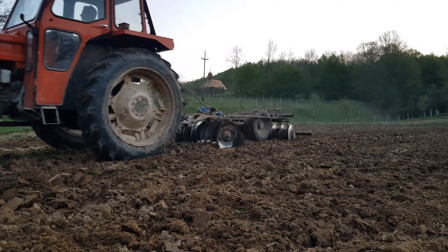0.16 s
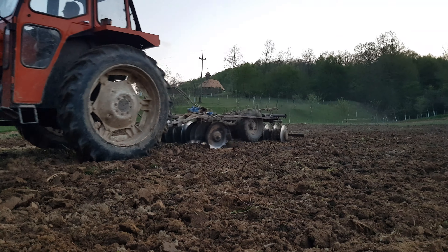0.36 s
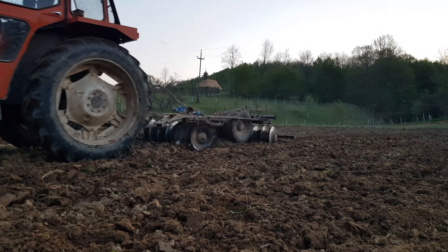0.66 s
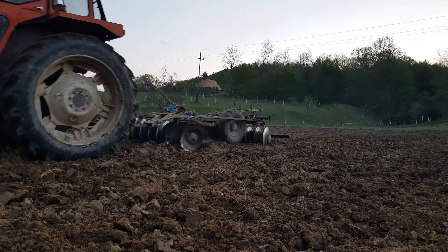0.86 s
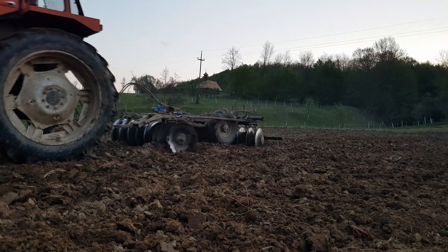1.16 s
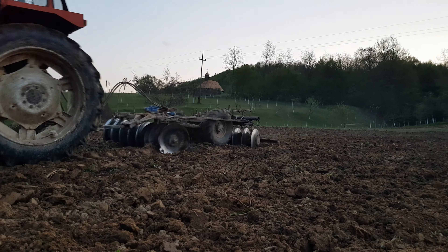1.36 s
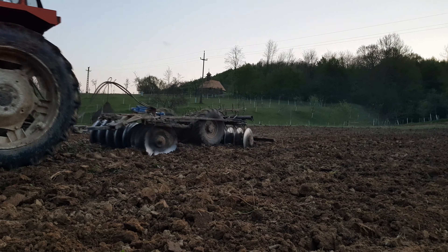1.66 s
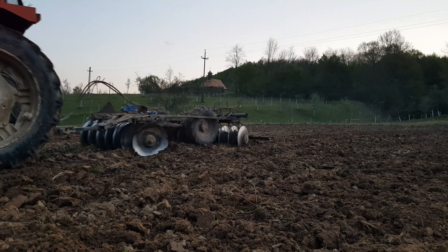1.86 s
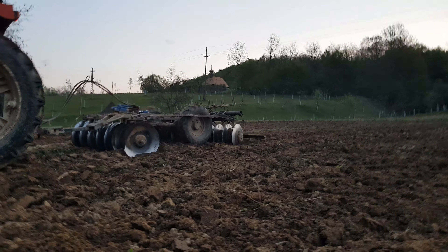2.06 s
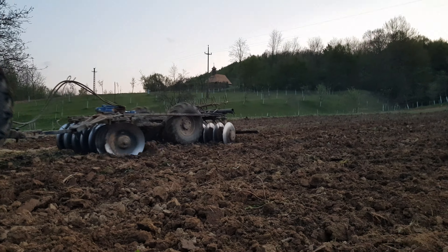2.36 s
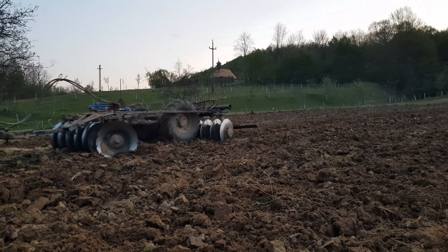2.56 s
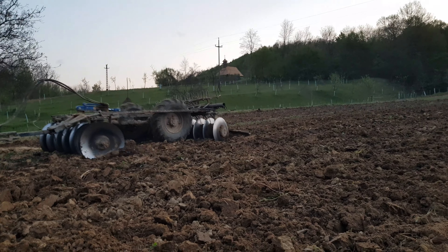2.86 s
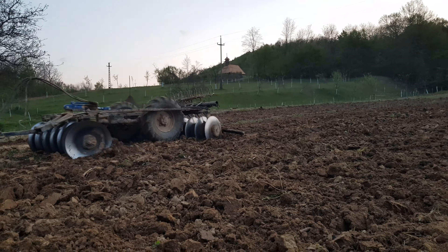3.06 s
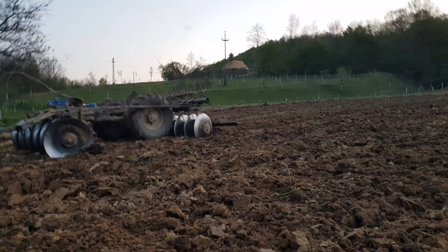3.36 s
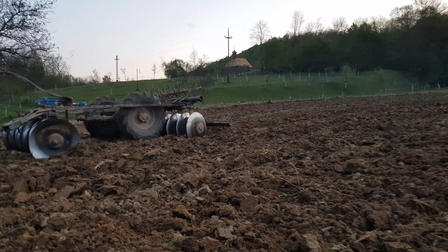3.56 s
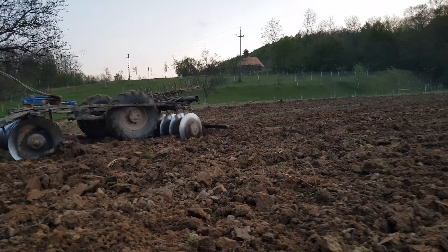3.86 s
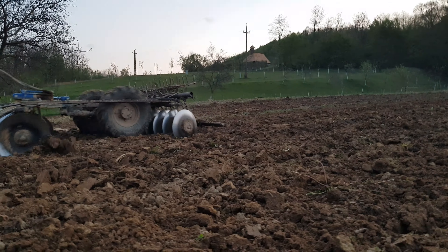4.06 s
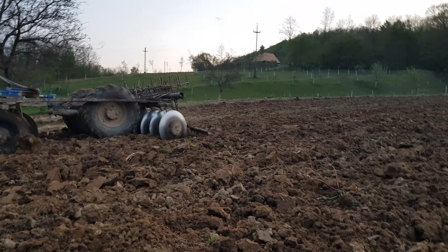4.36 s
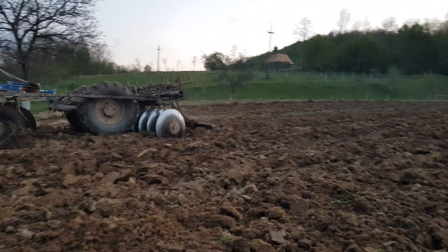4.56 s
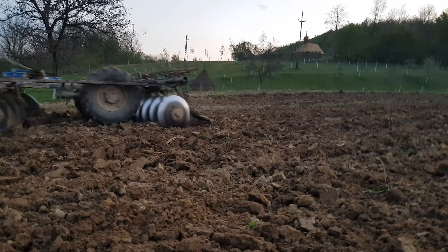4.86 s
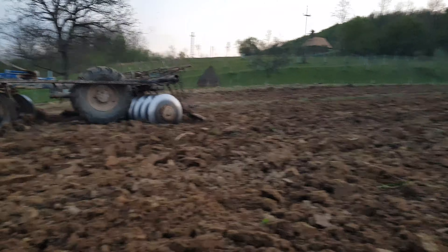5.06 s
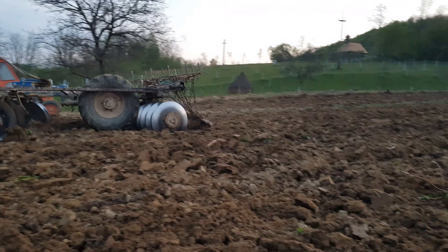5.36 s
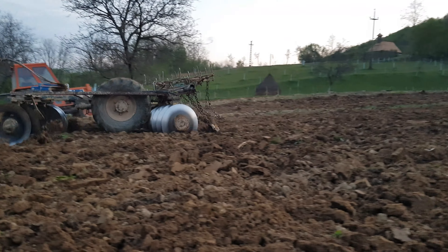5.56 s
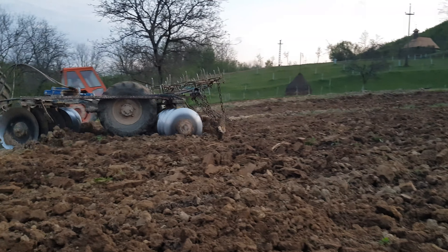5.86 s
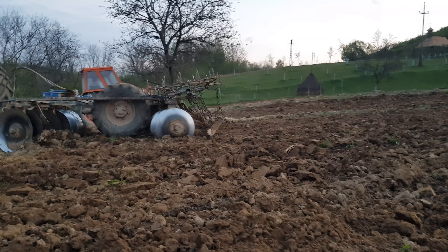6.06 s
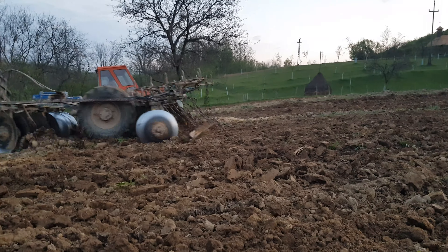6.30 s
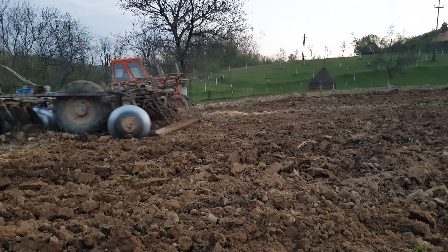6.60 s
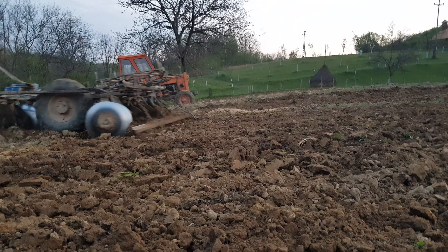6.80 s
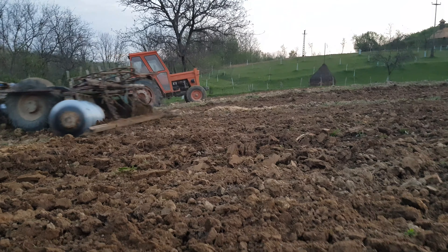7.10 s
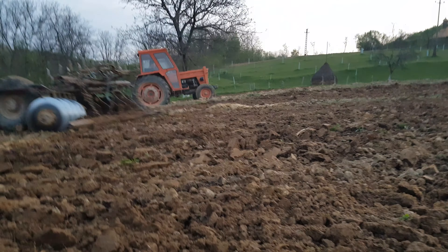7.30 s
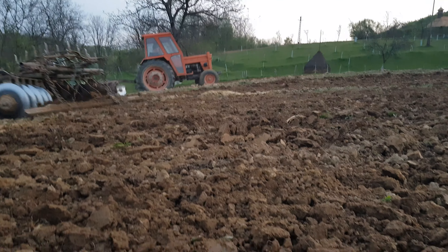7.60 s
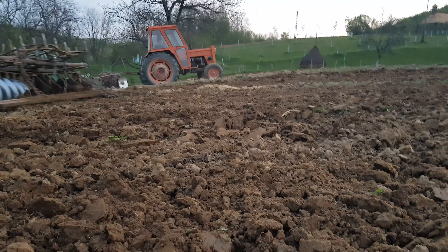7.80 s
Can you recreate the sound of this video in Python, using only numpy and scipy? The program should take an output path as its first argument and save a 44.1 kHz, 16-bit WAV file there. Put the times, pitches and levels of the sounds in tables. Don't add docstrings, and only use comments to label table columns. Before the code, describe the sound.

Close rough diesel clatter fades over a tilled field while a dry bearing squeals, discs click against stones, and another tractor's buzzing engine takes over.

```python
import sys
import numpy as np
from scipy import signal
from scipy.fft import rfft, irfft
from scipy.io import wavfile
from scipy.ndimage import map_coordinates

SR = 44100
rng = np.random.default_rng(int(sys.argv[2]) if len(sys.argv) > 2 else 0)


def transcribe(u):
    v = np.clip(np.atleast_2d(u).T, -1, 1)
    q = np.round(v * 32767).astype(np.int16)
    wavfile.write(sys.argv[1], SR, q)


def linear_from_db(decibels):
    return 10 ** (np.asarray(decibels, float) / 20)


N = 350154
TIME = np.arange(N) / SR
HZ = np.fft.rfftfreq(N, 1 / SR)

# t/s, distance loss as level/dB, lead of the left port/samples
NEAR_PATH = [
    (0, 0.5, 14.4),
    (1, 0.5, 17.5),
    (1.6, 2, 17.8),
    (2.5, -3, 19),
    (3.5, -3.5, 19),
    (4.5, -6, 19.6),
    (5.5, -6, 19.2),
    (6.3, -10.5, 11.2),
    (8, -14, 7),
]


def rms_one(x):
    return x / np.sqrt(np.mean(x ** 2) + 1e-20)


def in_time(rows):
    s, *columns = np.transpose(rows)
    return [np.interp(TIME, s, c) for c in columns]


def after(at_s, over_s):
    return 1 / (1 + np.exp((at_s - TIME) / over_s))


def around(at_s, over_s):
    return np.exp(-((TIME - at_s) / over_s) ** 2)


def at_hz(points):
    hz, value = np.transpose(points)
    return np.interp(np.log(HZ + 1), np.log(hz), value)


def filtered(x, response):
    return irfft(rfft(x) * linear_from_db(at_hz(response)), N)


def coloured(x, spectrum):
    return rms_one(filtered(x, spectrum))


def drift(rate):
    r = np.exp(-80 * np.pi * rate / SR)
    slow = signal.lfilter([1], [1, -2 * r, r * r], rng.standard_normal(N // 40 + 2002))[2000:]
    return np.interp(np.arange(N) / 40, np.arange(len(slow)), rms_one(slow))


def late(x, samples):
    return map_coordinates(x, [np.arange(N) - samples], order=3, mode="nearest")


def train(at, db):
    clicks = np.zeros(N)
    clicks[at] = linear_from_db(db)
    return clicks


def dying(clicks, rise_s, fall_s):
    rise, fall = np.exp(-2 / (rise_s * SR)), np.exp(-1 / (fall_s * SR))
    tails = signal.lfilter([1], [1, -fall], clicks)
    return signal.lfilter([(1 - rise) ** 2], [1, -2 * rise, rise ** 2], tails)


def ring(clicks, hz, t60):
    r, w = linear_from_db(-60 / (t60 * SR)), 2 * np.pi * hz / SR
    return signal.lfilter([0, np.sin(w)], [1, -2 * r * np.cos(w), r * r], clicks + 1e-18)


def firings(turns, offset, jitter_s):
    at = np.flatnonzero(np.diff(np.floor(turns - offset))) + 1
    moved = at + (jitter_s * SR * rng.standard_normal(len(at))).astype(int)
    return np.clip(moved, 0, N - 1), np.floor(turns[at] - offset).astype(int)


def exhaust(turns, orders, level_db, pipe_lag, pipe_phase, wobble_db):
    tones = 0
    for k, db in orders:
        phase = k * (2 * np.pi * turns - pipe_lag) - pipe_phase
        tones = tones + linear_from_db(db + wobble_db * drift(3.3)) * np.cos(phase)
    return np.sqrt(2) * linear_from_db(level_db) * tones


def ports(pair, lead):
    # f/Hz, likeness (0-1)
    likeness = [(100, .995), (700, .98), (1500, .92), (3000, .75), (6000, .5), (16000, .5)]
    alike = np.clip(at_hz(likeness), 0, 1)
    first, second = rfft(pair)
    other = irfft(alike * first + np.sqrt(1 - alike ** 2) * second, N)
    return np.array([pair[0], late(other, lead)])


def cab_hides(at_s=6.12):
    return after(at_s, 0.45)


def near_level(close_db, share, hidden_db, hidden=None):
    hidden = cab_hides() if hidden is None else hidden
    return close_db + share * in_time(NEAR_PATH)[0] + hidden_db * hidden


def near_knock(at, force_db):
    # f/Hz, level/dB, t60/s
    block = [(1340, 7, 0.0086), (2032, -5.5, 0.029), (2180, -4.5, 0.032), (2383, 9, 0.012),
             (2696, 0, 0.026), (2980, -4, 0.016), (3730, 3.5, 0.015), (4103, -1.5, 0.031),
             (4700, -31, 0.016), (5610, 7, 0.0059), (6300, -27, 0.0067)]
    # f/Hz, level per Hz/dB
    knock_colour = [(300, -52), (800, 10), (1300, 10), (2500, 6.5), (3600, 11.5), (5000, 11.5),
                    (8000, 13.5), (16000, -3)]
    body = dying(train(at, force_db), rise_s=0.0007, fall_s=0.0058) * rng.standard_normal((2, N))
    white = rng.standard_normal((2, N))
    rings = 0
    for hz, db, t60 in block:
        mode_db = force_db + db + 2.0 * rng.standard_normal(len(at))
        burn = dying(train(at, mode_db), rise_s=0.0034, fall_s=0.0089)
        rings = rings + ring(burn * white, hz, t60)
    knock = coloured(rms_one(body) + linear_from_db(-4) * rms_one(rings), knock_colour)
    return linear_from_db(near_level(-33.5, 0.92, -22)) * knock


def near_leak(at, force_db):
    # f/Hz, level per Hz/dB
    jet_colour = [(2500, -20), (5000, -4), (8500, -2), (11000, 1), (16000, 2)]
    crack_db = force_db + 1.4 * rng.standard_normal(len(at))
    crack = dying(train(at, crack_db), rise_s=0.0033, fall_s=0.003) * rng.standard_normal((2, N))
    level_db = near_level(-31.5, 0.17, -32, hidden=cab_hides(at_s=5.5))
    return linear_from_db(level_db) * coloured(crack, jet_colour)


def near_rattle(turns):
    # f/Hz, level per Hz/dB
    rattle_colour = [(200, -74), (500, 0.5), (1000, 2), (2000, -2), (4000, -6.5), (8000, -3.5),
                     (16000, -8.5)]
    swell = linear_from_db(0.58 * drift(24) + 0.078 * np.cos(4 * np.pi * turns))
    rattle = coloured(rng.standard_normal((2, N)) * swell, rattle_colour)
    return linear_from_db(near_level(-37, 0.59, 0)) * rattle


def near_pops(at, pop_db, pitch, pop_ms):
    level_db = -45 + 5.5 * around(3.6, 0.99) - 23.5 * cab_hides()
    pop_at = np.clip(at + (pop_ms * SR / 1000).astype(int), 0, N - 1)
    pop_db = pop_db + 0.5 * rng.standard_normal(len(at))
    pops = rms_one(dying(train(pop_at, pop_db), rise_s=0.002, fall_s=0.008))
    pipe_hz = 495 + (580.3 - 495) * after(3.2, 0.4)
    pipe_hz = pipe_hz * np.interp(np.arange(N), pop_at + 200, pitch) * (1 + 0.03985 * drift(50.2))
    phase = 2 * np.pi * np.cumsum(pipe_hz) / SR
    return linear_from_db(level_db) * pops * (0.27 * np.cos(0.82 * phase) + 0.5 * np.cos(1.03 * phase))


def near_exhaust(turns):
    # multiple of the firing rate, level under the boom/dB
    upper_orders = [(1, -19), (1.5, -18), (2.5, -14), (3.25, -15), (4, -10), (4.25, -15), (5, -13),
                    (6, -14), (7, -20), (8.5, -25), (9.5, -24), (11.5, -24)]
    level_db = near_level(-26.5, 0.4, -1.8)
    away_db = -5 * after(2.0, 0.35) - 5 * cab_hides()
    third_db = -26 + away_db - level_db
    boom = exhaust(turns, [(2, 0), (3, third_db)], level_db, pipe_lag=0.45, pipe_phase=0.75, wobble_db=1.0)
    upper = exhaust(turns, upper_orders, -26 + 0.97 * away_db, pipe_lag=0.45, pipe_phase=0.75, wobble_db=2.2)
    throb = 1 + 0.38 * np.cos(2 * np.pi * (turns / 4 - 0.38))
    return boom + throb * upper


def near_tractor():
    # t/s, firing rate/Hz
    speed = [(0.0, 30.47), (2.46, 30.87), (2.77, 31.38), (2.92, 30.6), (4.52, 31.9), (4.64, 31.49),
             (5.8, 33.39), (8.0, 38.22)]
    # knock level/dB, brightness/dB, pop level/dB, pop pitch factor, pop lag/ms
    cylinders = [
        (3, 9, -7, 1.0, 9.6),
        (4, 10.5, -7, .95, 9),
        (1, 8, 1, 1.05, 14),
        (0, 10.5, 0, .95, 7.82),
    ]
    hunt_hz = 0.221 * np.sin(2 * np.pi * 1.201 * (TIME - 0.617))
    turns = np.cumsum(in_time(speed)[0] + hunt_hz) / SR - 0.2
    at, number = firings(turns, offset=0.78, jitter_s=0.0014)
    force_db, bright_db, pop_db, pitch, pop_ms = np.array(cylinders)[number % 4].T
    force_db = force_db + 1.25 * rng.standard_normal(len(at))
    engine = near_knock(at, force_db) + near_leak(at, force_db + bright_db) + near_rattle(turns)
    engine = engine + near_pops(at, pop_db, pitch, pop_ms)
    return ports(engine, in_time(NEAR_PATH)[1]), near_exhaust(turns)


def far_clatter(turns, level_db, lead, clear):
    # delay/ms, delay lost in the turn/ms, strength
    echoes = [
        (1.02, .27, .25),
        (1.84, .43, .45),
    ]
    # f/Hz, level per Hz/dB
    left_colour = [(250, 10), (500, -10), (780, 12), (1100, 7.5), (1640, 5.5), (2150, 17), (2780, 9.5),
                   (3050, 4), (4300, 12.5), (5500, 2.5), (7200, 7.5), (13000, 6.5)]
    right_colour = [(250, -29), (500, -16), (800, 16), (1100, 1.5), (1500, 14.5), (1640, -18), (1900, 6.5),
                    (2500, 3.5), (3300, 10.5), (4300, 11), (5700, 5), (11500, 7.5)]
    at, _ = firings(turns, offset=0.8, jitter_s=0.0005)
    force_db = 1.5 * rng.standard_normal(len(at))
    blows = rms_one(dying(train(at, force_db), rise_s=0.0025, fall_s=0.0012)) + 2.2
    clatter_db = -47 + 0.25 * (level_db - level_db.max()) + 6.5 * clear
    clatter = linear_from_db(clatter_db) * ports(rms_one(blows * rng.standard_normal((2, N))), lead)
    rasp_band = signal.butter(2, [3700, 4700], "band", fs=SR, output="sos")
    rasp_db = -5.5 - 42.5 + 37 * around(7.35, 0.47)
    clatter = clatter + linear_from_db(rasp_db) * signal.sosfilt(rasp_band, clatter * blows)
    soil = signal.butter(1, 5000, fs=SR, output="sos")
    dull = signal.sosfilt(soil, clatter)
    turned = after(7.15, 0.5)
    for ms, gained, strength in echoes:
        delay = (ms - gained * turned) * SR / 1000
        clatter = clatter + strength * np.array([late(side, delay) for side in dull])
    return np.array([filtered(clatter[0], left_colour), filtered(clatter[1], right_colour)])


def far_exhaust(turns, level_db, clear):
    # multiple of the firing rate, level under the boom/dB
    upper_orders = [(3, -17), (4, -23), (6, -26)]
    upper_db = -4 + 9 * around(7.2, 0.3)
    orders = [(1, 0), (2, -2.5 + 2 * clear)] + [(k, db + upper_db) for k, db in upper_orders]
    return exhaust(turns, orders, level_db, pipe_lag=0.75, pipe_phase=0.25, wobble_db=0.6)


def far_tractor():
    # t/s, firing rate/Hz
    speed = [(0.0, 45.57), (2.23, 46.1), (2.5, 50.44), (3.0, 48.25), (3.25, 52.04), (3.54, 52.03),
             (4.01, 54.45), (4.25, 51.8), (4.5, 57.19), (4.95, 55.57), (5.74, 56.07), (5.99, 54.49),
             (6.32, 55.13), (6.75, 53.49), (7.08, 57.35), (7.72, 57.74), (8.0, 57.0)]
    # t/s, exhaust level/dB, lead of the left port/samples
    path = [(0, -46, 14), (1, -41, 13), (1.85, -41, 12), (2.15, -33, 12), (2.9, -31, 12), (3.3, -28, 12),
            (4.15, -28, 12), (4.5, -24.5, 11), (6, -24, 7.3), (7, -23.5, 6), (8, -26, 4.5)]
    level_db, lead = in_time(path)
    clear = after(5.9, 0.23)
    turns = np.cumsum(in_time(speed)[0]) / SR
    return far_clatter(turns, level_db, lead, clear), far_exhaust(turns, level_db, clear)


def squeal():
    # t/s, peak level/dB, pitch f/Hz
    grip_events = [(4.8, -47, 4805), (5.03, -47, 4815), (5.19, -44, 4900), (5.25, -42, 4880),
                   (5.4, -38, 4885), (5.49, -39, 4865), (5.56, -38, 4840), (5.69, -30, 4900),
                   (5.77, -42, 4860), (5.96, -34, 4930), (6.03, -35, 4935), (6.145, -32, 4950),
                   (6.2, -38, 4960), (6.3, -43, 4935), (6.37, -36, 4915), (6.455, -41, 4885),
                   (6.52, -41, 4880), (6.58, -47, 4895), (6.7, -49, 4805)]
    s, db, hz = np.transpose(grip_events)
    rise_s, fall_s = 0.01, 0.05
    phase = 2 * np.pi * np.cumsum(np.interp(TIME, s, hz) + 16 * drift(70)) / SR
    octave_db = -18 + 16 * around(5.24, 0.1) + 3.0
    tone = np.cos(phase) + linear_from_db(octave_db) * np.cos(2 * phase)
    start = ((s - rise_s * 2.3) * SR).astype(int)
    grips = dying(train(start, db), rise_s, fall_s)
    rub = linear_from_db(-49) * after(4.86, 0.07) * (1 - after(6.61, 0.07))
    skipped = linear_from_db(-50) * around(5.05, 0.08) * np.cos(phase / 3)
    return linear_from_db(1.2 + 1.8 * drift(40)) * (grips + rub) * tone + skipped


def stones():
    # t/s, peak level/dB, decay length/s
    strikes = [
        (3.375, -6.5, 0.022),
        (4.331, -6, 0.015),
        (4.921, -6, 0.043),
        (4.952, -25, 0.016),
        (5.294, -14, 0.024),
        (5.743, -14, 0.016),
        (6.645, -4, 0.0065),
        (7.175, -9, 0.025),
        (7.703, -14.5, 0.017),
    ]
    # f/Hz, level per Hz/dB
    stone_colour = [(300, 1), (1000, 19.5), (2500, 12.5), (5000, 13.5), (8000, 18), (16000, 10.5)]
    out, white = np.zeros((2, N)), coloured(rng.standard_normal((2, N)), stone_colour)
    since = np.arange(round(0.15 * SR)) / SR
    for s, db, length in strikes:
        at = slice(round(s * SR), round(s * SR) + len(since))
        burst = (1 - np.exp(-since / 0.00069)) * np.exp(-since / length)
        out[:, at] += linear_from_db(db - 18.5) * burst * white[:, at]
    return out


def ground_rumble():
    # f/Hz, level per Hz/dB
    rumble_colour = [(20, -24), (40, -10), (80, -4), (150, 0), (300, -5), (600, -16), (1200, -35)]
    surges = rng.standard_normal((2, N)) * linear_from_db(1.94 * drift(48))
    return linear_from_db(near_level(-30, 0.89, 6.3) - 3.0) * coloured(surges, rumble_colour)


def through_ports(bright):
    # f/Hz, level/dB
    left_port = [(150, 14.0), (380, -0.4), (550, 0.8), (900, -4.7), (1500, -2.2), (1900, -6.3),
                 (2500, -5.5), (2850, -3.1), (3600, -7.3), (4300, -5.8), (4750, -13.4), (8000, -18.3),
                 (11500, -17.6), (15500, -20.8)]
    right_port = [(150, 12.4), (380, -2.4), (550, -0.9), (900, -5.6), (1500, 0.0), (2300, -1.4),
                  (2600, -3.6), (2850, -2.9), (3700, -8.6), (4900, -10.6), (5800, -8.8), (8100, -29.5),
                  (12500, -20.0), (15500, -21.1)]
    return np.array([filtered(bright[0], left_port[1:]), filtered(bright[1], right_port[1:])])


def scene():
    near, near_boom = near_tractor()
    far, far_boom = far_tractor()
    harrow = ports(stones() + squeal(), 19.07)
    bright = through_ports(near + far + harrow)
    boom = near_boom + far_boom
    lead = 16.3 - 9.7 * after(5.86, 0.45)
    bass = ports(ground_rumble(), lead) + [boom, late(boom, lead)]
    return linear_from_db(10.5) * bright + bass * linear_from_db(np.array([[0.7], [-0.7]]))


def top_cut(x):
    return signal.sosfilt(signal.butter(12, 16990, fs=SR, output="sos"), x)


def record(dry):
    low_pass = signal.ellip(10, 0.5, 70, 15850, fs=SR, output="sos")
    mix = signal.sosfilt(low_pass, dry)
    return top_cut(mix)


dry = scene()
out = record(dry)
transcribe(out)
```